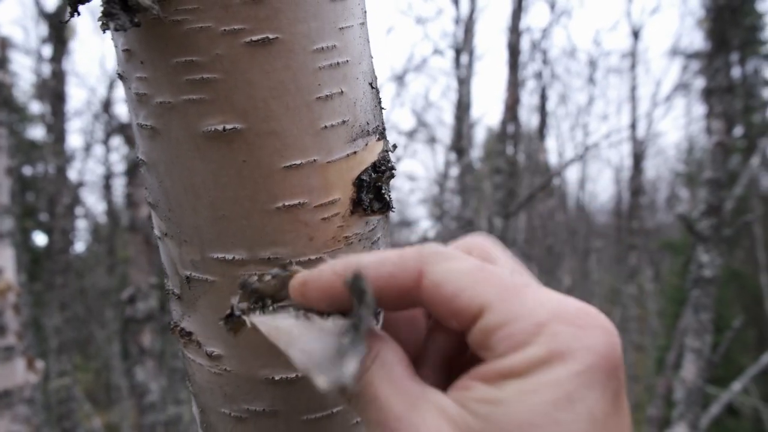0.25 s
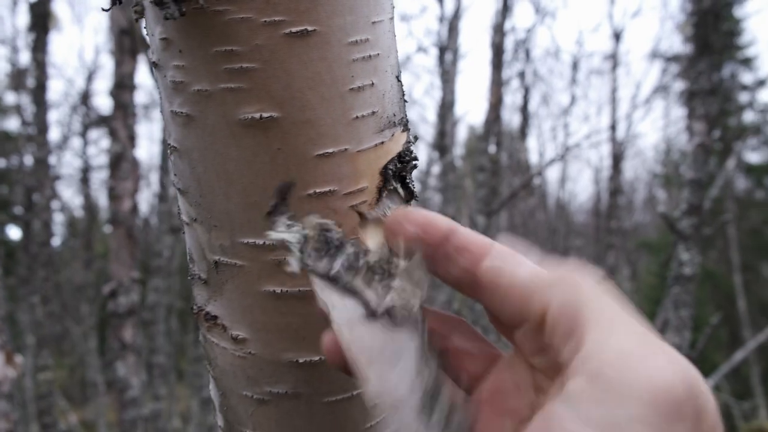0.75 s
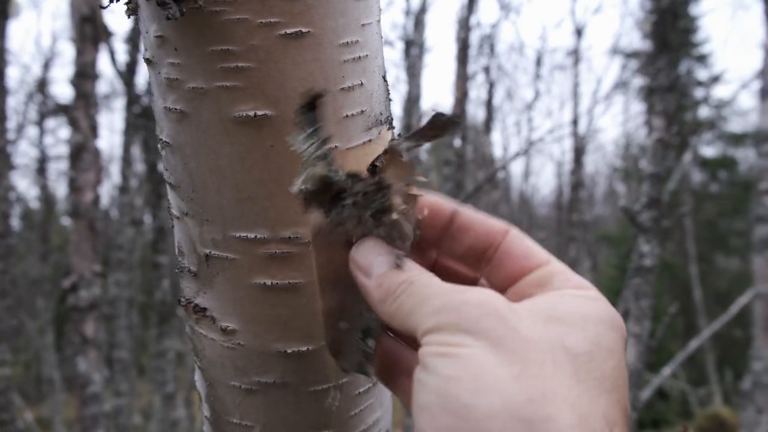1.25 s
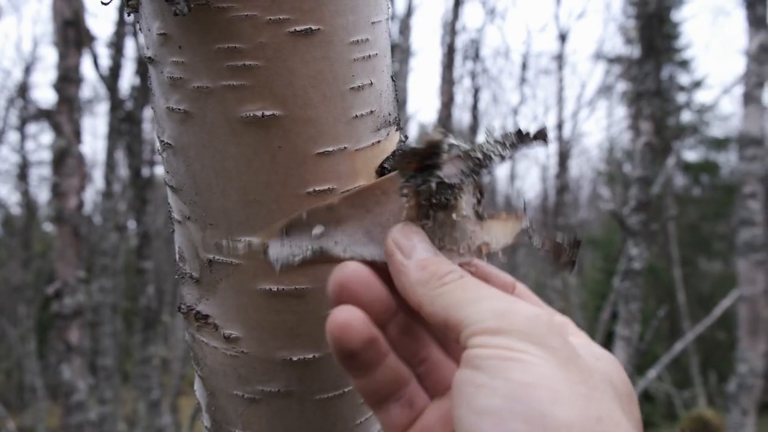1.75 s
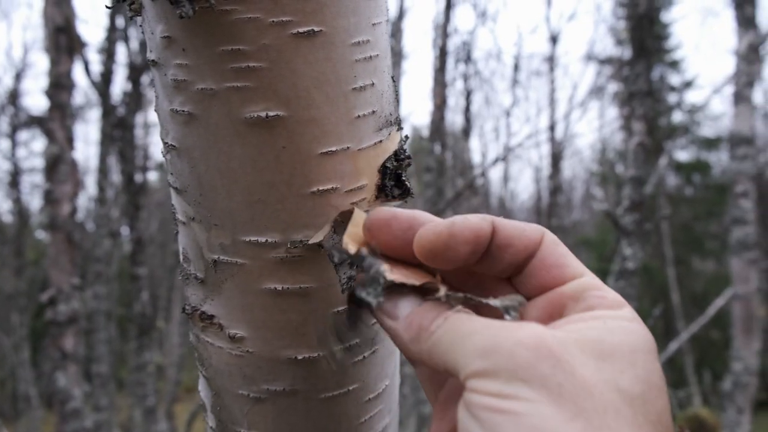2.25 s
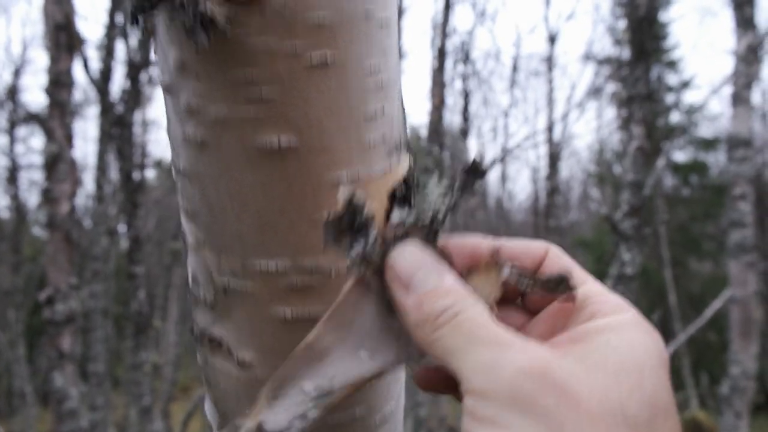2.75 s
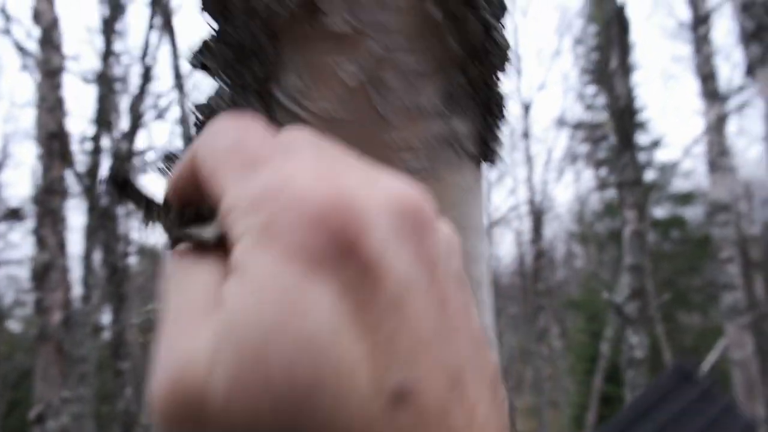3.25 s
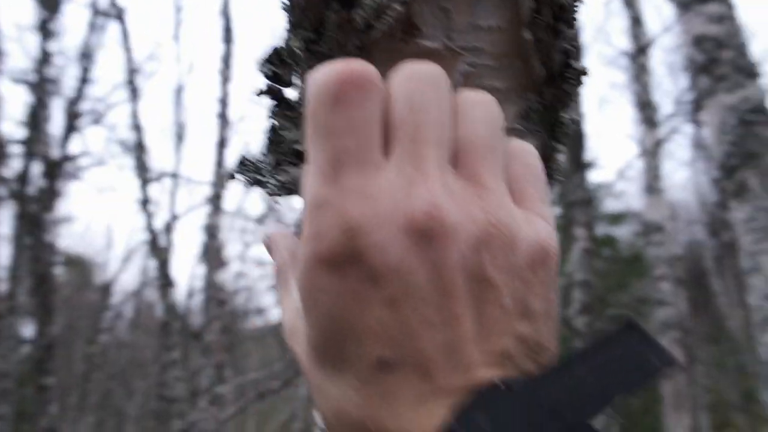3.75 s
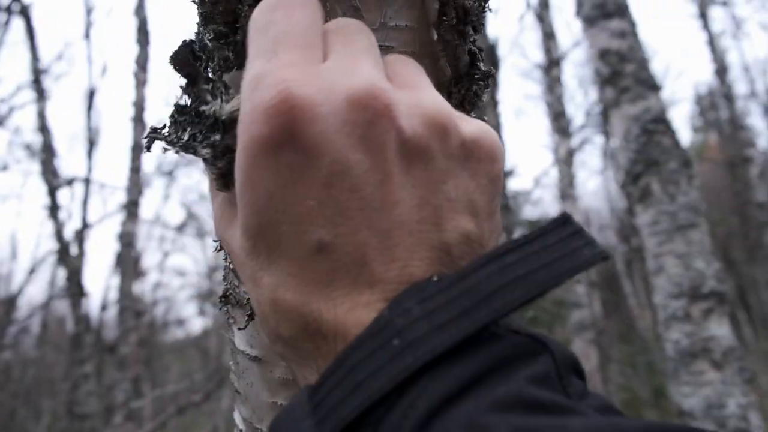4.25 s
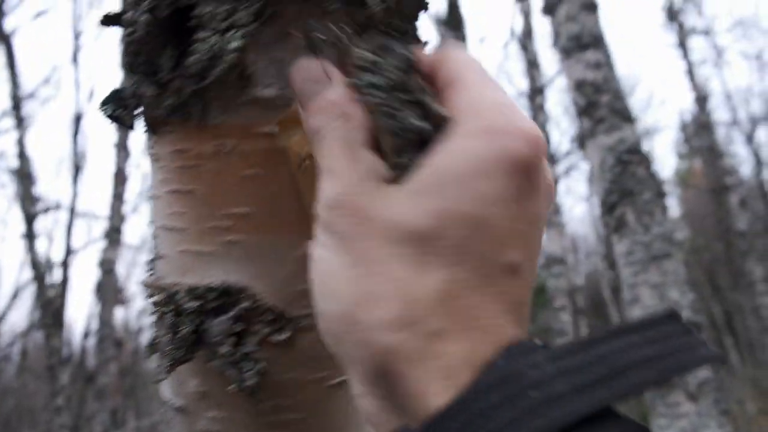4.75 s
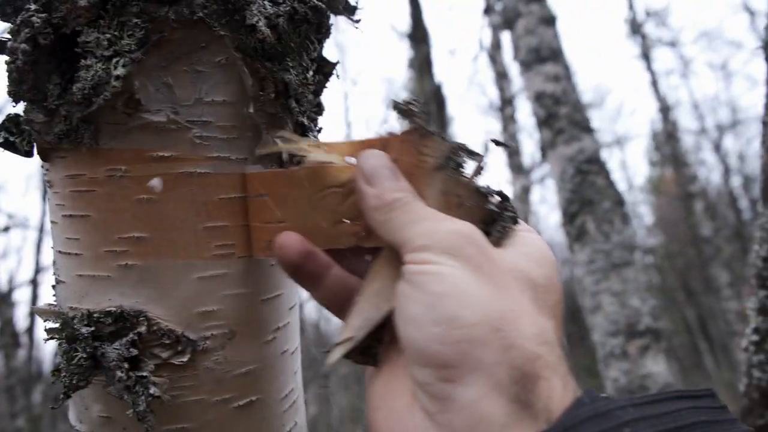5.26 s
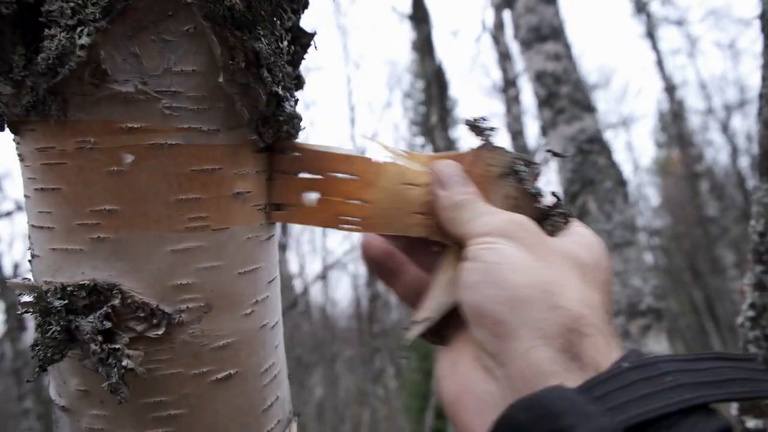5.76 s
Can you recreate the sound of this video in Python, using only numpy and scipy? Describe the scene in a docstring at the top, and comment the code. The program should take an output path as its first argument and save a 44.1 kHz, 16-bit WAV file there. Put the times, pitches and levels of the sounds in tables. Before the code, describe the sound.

Irregular strokes of fingers and sleeve over thin birch bark, dry and crisp, with small flakes ticking and loud snaps breaking out. Light wind buffets the microphone in the first half. Later the bark gives way in a quick jerky rip, then a band peels in small tugs with a low, sinking drum and a hard final crack. Close, dry outdoor stereo with a faint dull forest hush.

```python
"""A sleeve swishes and papery birch bark crinkles close to a small stereo microphone in a quiet, dull wood.
Rubbing is thousands of tiny slips through resonances of bark and sleeve; brittle snaps are short bursts
that ring the bark and a flake. Gusts are lumpy low noise on the microphone, the background hush is dull
noise whose level dips briefly, and knocks ring the trunk. Fibres rip in jerks, and at the end a long band
is pulled off the trunk: small tugs drum it softly under tension, its pitch sinking, and it cracks as it tears."""
import sys
import numpy as np
from scipy import signal
from scipy.fft import rfft, irfft, next_fast_len
from scipy.io import wavfile
from scipy.ndimage import uniform_filter1d

SR = 44100
rng = np.random.default_rng(int(sys.argv[2]) if len(sys.argv) > 2 else 0)


def inscribe(sig):
    """Save sig as 16-bit PCM at rate SR to the path in sys.argv[1].

    A 1-D sig is mono; a 2-D sig holds one channel per row.
    Samples are clipped to [-1, 1] before scaling.
    """
    pcm = np.round(np.clip(np.atleast_2d(sig).T, -1, 1) * 32767)
    wavfile.write(sys.argv[1], SR, pcm.astype(np.int16))


N = 265041  # samples, about 6 s


def from_db(db):
    """Decibels to gain."""
    return 10 ** (np.asarray(db) / 20)


def rms_one(x):
    """Scale to unit power."""
    return x / np.sqrt(np.mean(x ** 2) + 1e-20)


def in_time(rows):
    """Interpolate each column of a curve, whose first column is seconds, at every sample."""
    s, *columns = np.transpose(rows)
    return [np.interp(np.arange(N) / SR, s, column) for column in columns]


def drift(rate):
    """Random wandering of rms 1, with straight lines between `rate` chance values a second."""
    knots = rng.standard_normal(4096)
    return rms_one(np.interp(np.arange(N) / SR * rate, np.arange(len(knots)), knots))


def equalise(x, spectrum):
    """Apply a gain curve of (Hz, dB) points, fading out below 20 Hz."""
    hz, db = np.transpose(spectrum)
    size = next_fast_len(N)
    f = np.maximum(np.arange(size // 2 + 1) * SR / size, 1)
    gain = from_db(np.interp(np.log(f), np.log(hz), db)) * np.minimum(f / 20, 1) ** 2
    return irfft(rfft(x, size) * gain, size)[:N]


def coloured(spectrum):
    """Steady noise with the given spectrum, rms 1."""
    return rms_one(equalise(rng.standard_normal(N), spectrum))


def resonate(x, modes, stretch=1):
    """Parallel resonances of alternating sign; stretch moves them all up or down together."""
    out = 0
    for k, (hz, width, db) in enumerate(modes):
        r = np.exp(-np.pi * width / SR)
        w = 2 * np.pi * hz * stretch / SR
        zeros = np.array([1, 0, -1]) * (1 - r * r) / 2
        poles = [1, -2 * r * np.cos(w), r * r]
        out = out + (-1) ** k * from_db(db) * signal.lfilter(zeros, poles, x + 1e-18)
    # a family radiates little outside its own range
    edges = [modes[0][0] * 0.65, min(modes[-1][0] * 1.26, SR * 9 / 20)]
    return signal.sosfilt(signal.butter(2, edges, "band", fs=SR, output="sos"), out)


def stereo(mid, side, pan_db):
    """Left and right from mid, side and a level difference."""
    return np.array([(mid + side) * from_db(pan_db / 2), (mid - side) * from_db(-pan_db / 2)])


def swells(start, length, level_db, attack_s, release_s, sag_db=0, size=32):
    """Gain of overlapping gestures: each rises, holds while it sags, and dies away; their powers add."""
    t = np.arange(0, N, size)[:, None] / SR
    early = np.maximum(start - t, 0)
    late = np.maximum(t - start - length, 0)
    along = np.clip((t - start) / np.maximum(length, .002), 0, 1)
    # attack and release are the times for 20 dB
    db = level_db - 20 * (early / attack_s + late / release_s) - sag_db * (along - .5)
    return np.interp(np.arange(N) / SR, t[:, 0], np.linalg.norm(from_db(db), axis=1))


# Colour of the far trees' hush. Each row: frequency in Hz, relative density in dB per Hz.
WOOD_AIR = [(25, 7), (70, -4.5), (150, -0.5), (290, 1), (470, 0.5), (750, -5.5), (1600, -8.5),
            (3000, -23.5), (6000, -49), (12000, -47)]
# Level of the background hush, which dips briefly now and then. Each row: time in seconds, level in dB.
AIR_DB = [(0, -59.5), (1.4, -61.5), (3.3, -61), (3.8, -64), (4.3, -63), (4.42, -71), (4.55, -71),
          (5, -59.5), (5.55, -66), (5.64, -73), (5.75, -72), (6, -62)]


def wood_air(side_db=-26):
    """The dull hush of the far trees: coloured noise at a varying level, nearly alike in both ears."""
    level_db, = in_time(AIR_DB)
    return from_db(level_db) * stereo(coloured(WOOD_AIR), from_db(side_db) * coloured(WOOD_AIR), 0)


# Colour of wind on the microphone. Each row: frequency in Hz, relative density in dB per Hz.
BUFFET = [(12, -25), (20, 2), (65, -0.5), (80, -3), (129, -7.5), (252, -24.5), (292, -27.5), (400, -30),
          (520, -27), (880, -120)]
# Gusts at the microphone. Each row: start in seconds, length in seconds, level in dB.
GUSTS = [(0, 0.023, -53), (0.244, 0.22, -60), (.5, 0.43, -50), (0.602, 0.021, -36.5), (0.721, 0.021, -36.5),
         (0.786, 0.027, -44), (2.408, 0.021, -50.5), (2.495, 0.054, -50), (2.662, 0.073, -48.5),
         (2.8, 0.14, -57)]
GUST_ATTACK_S, GUST_RELEASE_S, CALM_DB = 0.045, 0.064, -79.5


def wind(lumps_db=4.5, lumps_per_s=34):
    """Lumpy low buffeting in gusts, alike in both ears."""
    gusts = swells(*np.transpose(GUSTS), GUST_ATTACK_S, GUST_RELEASE_S) + from_db(CALM_DB)
    return gusts * from_db(lumps_db * drift(lumps_per_s)) * coloured(BUFFET)


# The hand knocks the trunk as a piece gives way. Each row: time in seconds, level in dB.
THUDS = [(0.963, -40.5), (2.731, -36), (2.737, -29)]
# Resonances of the damp trunk. Each row: frequency in Hz, width in Hz, relative level in dB.
TRUNK = [(270, 59, 2), (555, 87, 2)]


def thuds():
    """The damp trunk answers a knock with a short, dull note."""
    knocks = np.zeros(N)
    for s, db in THUDS:
        knocks[round(s * SR)] = from_db(db)
    sound = resonate(knocks, TRUNK)
    # the peak of the whole equals the strongest knock
    return sound * knocks.max() / np.abs(sound).max()


# Tugs that peel the long band off the trunk. Each row: start in seconds, length in seconds,
# crackle at the peel line in dB, drumming of the band in dB.
TUGS = [(5.167, 0.02, -43, -44), (5.22, 0.064, -51.0, -54), (5.333, 0.097, -53.5, -57.5),
        (5.453, 0.009, -45.5, -44.5), (5.507, 0.015, -51.5, -60), (5.694, 0.013, -52, -50),
        (5.755, 0.033, -50.5, -55.5), (5.793, 0.041, -58, -64)]
TUG_ATTACK_S, TUG_RELEASE_S = 0.043, .032
# The band sinks in pitch as it grows. Each row: time in seconds, pitch in Hz.
BAND_PITCH = [(5.17, 303), (5.28, 248), (5.7, 243), (5.8, 195)]


def taut_band(width_hz=75, tugs_per_s=350, size=128):
    """Small tugs at the peel line drum the band, whose pitch sinks as it grows longer."""
    s, length, _, drum_db = np.transpose(TUGS)
    pull = swells(s, length, drum_db, TUG_ATTACK_S, TUG_RELEASE_S)
    hz, = in_time(BAND_PITCH)
    tugs = (rng.random(N) < tugs_per_s / SR) * rng.standard_normal(N) + 1e-18
    out, state = np.zeros(N), np.zeros(2)
    r = np.exp(-np.pi * width_hz / SR)
    # retune block by block, carrying the vibration over
    for i in range(0, N, size):
        poles = [1, -2 * r * np.cos(2 * np.pi * hz[i] / SR), r * r]
        out[i:i + size], state = signal.lfilter([1, 0, -1], poles, tugs[i:i + size], zi=state)
    # even out the drumming over 50 ms so that the pull sets its level
    return pull * out / np.sqrt(uniform_filter1d(out ** 2, size=2200) + 1e-12)


# Ring of the stiff outer layer. Each row: frequency in Hz, width in Hz, relative level in dB.
RIP_RING = [(1720, 530, -11), (2640, 400, -5), (3070, 340, -5.5), (3860, 260, 1), (4460, 290, 0)]
# The thick outer layer rips loose in jerks. Each row: start in seconds, length in seconds, level in dB.
RIPS = [(4.573, 0.045, -38.5), (4.617, .002, -39), (4.66, 0.006, -26)]
RIP_ATTACK_S, RIP_RELEASE_S = .01, 0.0045


def rip(per_s=1400, spread_db=5.5, side_db=-9, pan_db=4):
    """Fibres part in a fast uneven run and set the stiff outer layer ringing."""
    jerks = swells(*np.transpose(RIPS), RIP_ATTACK_S, RIP_RELEASE_S)
    sizes = from_db(spread_db * np.minimum(rng.exponential(1, N), 3))
    breaks = (rng.random(N) < per_s / SR) * sizes
    push = np.array([breaks * rng.choice([-1, 1], N), breaks * rng.standard_normal(N)])
    mid, side = resonate(push, RIP_RING)
    return jerks * stereo(rms_one(mid), from_db(side_db) * rms_one(side), pan_db)


# Strokes of fingers and sleeve over the bark. Each row: start in seconds, length in seconds,
# level of the sheet's ring in dB, its bending in dB relative to that, its fine edges likewise.
STROKES = [(0, 0.011, -47, 1, 2), (0.048, 0.058, -50.5, -1, 2.5), (0.221, 0.034, -61.5, -8, 0.5),
           (0.403, 0.011, -45.5, -2.5, -4), (0.524, 0.019, -47.5, -1.5, -4), (0.585, 0.012, -51, 0.5, -8),
           (0.64, 0.073, -58, 3, -4), (0.765, 0.021, -62.5, 8.5, 0.5), (0.932, 0.038, -46.5, -1, -9.5),
           (1.041, 0.024, -56.5, 4, 1.5), (1.117, 0.059, -62.5, 8, 6.5), (1.201, 0.029, -43.5, -4, -2.5),
           (1.26, 0.032, -53.5, -0.5, -6), (1.408, 0.014, -44.5, -3.5, -7), (1.435, 0.103, -50.0, -1, -7.5),
           (1.715, 0.0089, -53.5, -3.0, -4.5), (1.801, 0.119, -52.5, -2.5, -4.5),
           (1.954, 0.06, -53, 1, 0.5), (2.096, 0.057, -48.5, -4.5, -1.5), (2.274, 0.059, -57.5, 2, 1.5),
           (2.374, 0.037, -50.5, -3.0, -3.5), (2.435, 0.084, -58.0, 1.5, 0.5), (2.621, 0.036, -53, -1, 1),
           (2.656, 0.081, -48.0, 4.0, -5), (2.827, 0.103, -52.5, -1, -5.5), (3.015, 0.092, -50, -1.0, 0),
           (3.152, 0.206, -55, 4, -1), (3.491, 0.05, -52, 0, -3.5), (3.669, 0.023, -60.5, 6.5, 0.5),
           (3.914, 0.11, -59.0, 0.5, -1.5), (4.092, 0.018, -56, 3.5, -12), (4.177, 0.094, -55, 2.5, -1.5),
           (4.294, 0.107, -51.0, -4.5, -6.5), (4.512, 0.195, -47.5, -8, -2.5),
           (4.658, 0.0072, -34.5, -6, -8), (4.723, 0.099, -54.0, -6, -6), (4.85, 0.059, -47.5, -5.5, -3.5),
           (4.947, 0.15, -51.5, -7, -5), (5.115, 0.018, -45, 1, -5.0)]
STROKE_ATTACK_S, STROKE_RELEASE_S = .044, .032
STROKE_SAG_DB = -1  # negative: each stroke presses harder along its way
# Light rustle of the bark in the hand, following the firmness of the grip.
# Each row: time in seconds, level of the sheet in dB.
GRIP = [(0.0, -57.5), (0.3, -79.5), (0.48, -63), (0.76, -77.0), (1.15, -58.5), (1.56, -61.0), (1.64, -77.5),
        (2.05, -63.0), (2.2, -72.5), (2.8, -61.5), (3.4, -59.5), (3.75, -70), (4.13, -64), (4.47, -60.5),
        (5.05, -57), (5.55, -63.5), (5.64, -70), (6.0, -75.0)]
# bending and fine edges relative to the sheet
PEEL_BEND_DB, PEEL_EDGE_DB = -4, -1.5
GRIP_BEND_DB, GRIP_EDGE_DB = 2.5, -1.5


def friction():
    """Level in dB of the bending, sheet and fine edges: strokes and tugs over the rustle of the grip."""
    s, length, level_db, bend_db, edge_db = np.transpose(STROKES)
    tug_s, tug_length, peel_db, _ = np.transpose(TUGS)
    tugs = swells(tug_s, tug_length, peel_db, TUG_ATTACK_S, TUG_RELEASE_S)
    grip_db, = in_time(GRIP)
    tints = [(bend_db, PEEL_BEND_DB, GRIP_BEND_DB), (0, 0, 0), (edge_db, PEEL_EDGE_DB, GRIP_EDGE_DB)]
    levels = []
    for stroke_tint, peel_tint, grip_tint in tints:
        strokes = swells(s, length, level_db + stroke_tint, STROKE_ATTACK_S, STROKE_RELEASE_S, STROKE_SAG_DB)
        peel = tugs * from_db(peel_tint)
        grip = from_db(grip_db + grip_tint)
        levels.append(10 * np.log10(strokes ** 2 + peel ** 2 + grip ** 2))
    return levels


def trunk_echo(x, echo=0.37, delay_ms=1.117, sway=0.226):
    """The trunk mirrors the sound; the comb of this short echo shifts as the hand moves."""
    n = np.arange(N)
    lag = delay_ms / 1000 * SR * np.exp(sway * drift(3.5))
    return np.array([ear + echo * np.interp(n - lag, n, ear) for ear in x]) / np.sqrt(1 + echo ** 2)


# What the hand is doing in front of the microphone. Each row: time in seconds, share of sleeve swish
# from 0 to 1, spread of the grain sizes in dB, left-right difference in dB.
HAND = [(0, 0.9, 3, 0), (.3, 0.35, 4.5, 3.5), (.55, 0.8, 4.5, 1.5), (.95, 0.67, 6.5, 1.5),
        (1.25, 0.74, 2, 0.5), (1.42, 0.08, 1, -0.5), (1.9, 0, 3.5, 0.5), (2.3, 0.5, 5.5, 0.5),
        (2.8, 0.23, 0.5, 1.5), (3.05, 0.9, 2.5, 1), (3.3, 0.66, 3, 4.5), (3.55, 0.05, 5, 0.5),
        (4.2, 0.33, 3.5, 3), (4.6, 0.22, 4, 1), (4.9, 0.28, 3.5, 1), (5.2, 0.69, 6, 1.5), (6, 0.08, 7, 3)]
# Resonances of the bark in three families: bending, sheet, fine edges.
# Each row: frequency in Hz, width in Hz, relative level in dB.
BARK = [
    [(454, 690, -5), (848, 270, 2), (1227, 610, 2), (1890, 440, 4.5), (2706, 830, 1.5)],
    [(3120, 1170, -1.5), (4070, 303, 6.5), (4730, 780, 3), (5900, 1260, 0)],
    [(6930, 1300, 0.5), (9070, 960, 5), (10750, 2040, 1.5)],
]
# Resonances of the sleeve's swish in the same three ranges, with the same columns.
SLEEVE = [
    [(398, 96, 2.5), (1076, 316, 6), (1770, 1020, 12), (2180, 1330, 12.5)],
    [(3380, 1000, -1), (4660, 3600, -4.5), (5550, 1280, 9)],
    [(8130, 2160, 0), (9570, 560, 6), (11050, 1260, -1.5)],
]
# Unlikeness of the two ears: side against mid in dB for each family, before the hand's place is added.
SIDE_DB = [-23, -10, -7]


def rubbing(levels_db, per_s=8000, flutter_db=1.75, own_flutter_db=2.0, family_db=(0, 0, 0),
            fibres_per_s=110, fibre_size=2.73, fibre_spread_db=3.0, centred_db=-5.0, off_axis=3.24):
    """Thousands of tiny slips a second excite bark and sleeve; crinkling makes them uneven and breaks fibres."""
    sleeve, spread_db, pan_db = in_time(HAND)
    sleeve = np.clip(sleeve, 0, 1)
    slip_sizes = from_db(spread_db * np.minimum(rng.exponential(1, N), 4))
    slips = (rng.random(N) < per_s / SR) * slip_sizes
    slips = slips * from_db(flutter_db * drift(260))
    # even out their power over 29 ms
    slips /= np.sqrt(uniform_filter1d(slips ** 2, size=1300) + 1e-9)
    # the more uneven the crinkling, the thicker the fibres that break; fewer under the sleeve
    fibre_sizes = from_db(fibre_spread_db * np.minimum(rng.exponential(1, N), 2))
    fibres = (rng.random(N) < fibres_per_s * (1 - sleeve / 2) / SR) * fibre_sizes
    slips += fibres * fibre_size * from_db(2 * spread_db)
    out = 0
    for k, level_db in enumerate(levels_db):
        # each slip radiates in a direction of its own
        push = slips * rng.choice([-1, 1], N)
        push = np.array([push, push * rng.standard_normal(N)])
        bark_part = np.sqrt(1 - sleeve) * rms_one(resonate(push, BARK[k]))
        sleeve_part = np.sqrt(sleeve) * rms_one(resonate(push, SLEEVE[k]))
        mid, side = bark_part + sleeve_part
        gain = from_db(level_db + family_db[k] + own_flutter_db * drift(60))
        # the further to the left the hand, the less alike the two ears
        unlike = from_db(SIDE_DB[k] + centred_db + off_axis * pan_db)
        # the low bending family is not shaded to one side
        out = out + gain * stereo(mid, side * unlike, pan_db * (k > 0))
    return trunk_echo(out)


# small flakes: their number, level above the rubbing, and tint and pitch around which each one scatters
TICK_COUNT, TICK_OVER_RUB_DB, TICK_SPREAD_DB = 18, 7.5, 3.5
TICK_BEND_DB, TICK_EDGE_DB, TICK_HZ = -8, -2, 3760


def ticks(rub_db, fracture_ms=0.86):
    """Rows like those of the snaps for small flakes that break at random, likelier in firm, uneven rubbing."""
    _, spread_db, pan_db = in_time(HAND)
    chance = np.cumsum(from_db(rub_db / 2 + spread_db))
    at = np.searchsorted(chance, rng.random(TICK_COUNT) * chance[-1])
    size, bend, edge, pitch = rng.standard_normal((TICK_COUNT, 4)).T
    level_db = rub_db[at] + TICK_OVER_RUB_DB + TICK_SPREAD_DB * size
    flake_hz = TICK_HZ * 2 ** np.tanh(pitch)
    return list(zip(at / SR, level_db, np.full(TICK_COUNT, fracture_ms),
                    TICK_BEND_DB + 5 * bend, TICK_EDGE_DB + 5 * edge, pan_db[at], flake_hz))


# The loud brittle snaps, close by. Each row: time in seconds, level in dB, length of the fracture in ms,
# bending in dB relative to the sheet, fine edges likewise, left-right difference in dB,
# ring of the flake in Hz.
SNAPS = [(.4075, -38, 0.079, -10, -1, 7, 5260), (.5943, -42.5, .45, -3, -1, 0, 5540),
         (.7193, -39.5, 0.18, 4.5, -5, 0.5, 2420), (.7837, -42, 1, -4, -1, 3, 4910),
         (.8945, -40, 0.95, 4, -7, 0.5, 4770), (.9243, -37.5, .2, -24, -12, 6, 5400),
         (.9278, -35, .5, -23, -4, 5, 5100), (.9384, -32.5, 0.34, -2, 0, 1, 3220),
         (.9417, -37, 0.35, -23, 1, -4, 3270), (.9609, -35, 0.47, -11, -3, 2, 5280),
         (.967, -31, 0.36, 2.5, 1, -6, 5700), (.9799, -41.5, 0.47, -4, -3, 6, 5690),
         (1.1994, -39.5, 0.21, 5, 5, -0.5, 6400), (1.2046, -29.5, .3, -10, 28, 6, 5260),
         (1.405, -37, .3, -15, -20, -0.5, 1430), (1.965, -27.5, 0.28, -12.5, -5, 2.5, 5100),
         (1.986, -38, .19, -5, -6, 3, 5030), (2.016, -35.5, 0.79, 18, 6, 2, 910),
         (2.3158, -42, .76, -2, -14, 2, 3100), (2.3946, -33.5, 0.19, 6, -10, 1.5, 1700),
         (2.612, -40, 1, -6, 5, 2, 1870), (2.6903, -27, 0.26, 8.5, -2, -.5, 2160),
         (2.7304, -34.5, 1, -2, -3, 1, 6100), (2.737, -21.5, 0.19, 9, -1.5, 0, 4920),
         (2.8951, -41.5, 0.29, 13, -7, 2, 2050), (2.962, -41, .3, 5, 16, 1, 5900),
         (3.164, -41, .6, -13, 3, 3, 6100), (3.2219, -36, 0.11, -27, 4, 7, 6060),
         (3.4142, -46, 0.32, -7, 25, 1, 780), (3.4265, -47.5, .25, -10, 20, 2, 5000),
         (3.7756, -51, 0.39, 5, 16, 7, 1600), (3.9969, -24.5, 0.11, -7, -6.5, 8.5, 4790),
         (3.9982, -20.5, 0.58, -10, -11, 0, 1670), (4.3385, -30.5, 0.45, -2.5, 0, 1, 3580),
         (4.3549, -38, .3, -1, 8, -1, 5950), (4.3578, -30, 0.15, -1, 10, 3, 2660),
         (4.363, -40, .26, 9, 10, 0, 3700), (4.3714, -40, .38, -20, 17, 13, 5340),
         (4.3834, -37, 0.3, -18, 0, -5, 3000), (4.4016, -28.5, 0.26, -11.5, -4.5, 1, 5380),
         (4.4486, -40.5, 0.44, -2.5, 0, 0, 3660), (4.5751, -37.5, 0.33, -25, -4, 3, 4480),
         (4.6006, -33, .55, -30, -18, -4, 3870), (4.6531, -34, .46, -6, -4, -3, 3830),
         (4.6613, -22.5, .37, -21, 0, 3, 4110), (4.6988, -37.5, .64, -2, -3, 1, 5900),
         (4.7353, -31.5, 1, -4, -5, 2, 3300), (4.8089, -41, .21, -19, -6, 3, 4600),
         (5.0278, -39.5, 0.53, 1, -2.5, 1, 2200), (5.0748, -38.5, 0.27, -10, -1, 2.5, 804),
         (5.1743, -29.5, 0.35, -1, 4, 0, 2490), (5.1961, -38, .3, 11, -10, -1, 1920),
         (5.2391, -45, 0.43, 9, 3, 0, 4940), (5.2682, -44, .3, -10, 3, 7, 4260),
         (5.2901, -33.5, 1, 3, 7, 3, 4770), (5.3368, -39.5, 0.54, -4, 2, -2, 5400),
         (5.4624, -24.5, .37, -4, 7, -2, 6740), (5.467, -37, 0.17, -9, 0, 7, 4870),
         (5.5664, -47.5, 0.28, 2, -1, -1, 2170), (5.595, -48, 0.32, -14, -4, 3, 5300),
         (5.6146, -17, 0.92, -5.5, -5, -0.5, 4540), (5.6759, -28, 0.1, 0.5, 0, -1, 5960),
         (5.697, -39, 0.99, 2, -3, -1, 4980), (5.748, -40.5, .54, -5, -19, 3, 4640),
         (5.7726, -39, 0.29, -3, -7, -1, 4670), (5.833, -44.5, .4, -2, 4, 1, 4800),
         (5.967, -50, 0.4, -5, -9, -1, 4800)]


def snaps(rows, splinter=0.33, tail_db=-17.5, tail_s=0.0023, detune=0.16, family_db=(-1, -1, -1),
          flake_db=-7, flake_width_hz=320, size=900):
    """One sharp break and a quick run of splinters; the bark answers and the flake rings at its own pitch."""
    out = np.zeros((2, N + size))
    t = np.arange(size) / SR
    for s, level_db, length_ms, bend_db, edge_db, pan_db, flake_hz in rows:
        grit = rng.standard_normal((2, size))
        fracture = splinter * np.exp(-t * 1e3 / max(length_ms, .05))
        push = grit * (fracture + from_db(tail_db) * np.exp(-t / tail_s))
        push[0, 0] += 2  # the sharp break, alike in both ears
        # the bark's resonances shift at random from snap to snap
        stretch = np.exp(detune * rng.uniform(-1.3, 1))
        at = round(s * SR)
        shares = from_db([bend_db, 0, edge_db])
        shares = shares / np.linalg.norm(shares) * from_db(family_db)
        flake = rms_one(resonate(push[0], [(flake_hz, flake_width_hz, 0)]))
        snap = from_db(flake_db) * stereo(flake, 0, pan_db)
        for modes, share, side_db in zip(BARK, shares, SIDE_DB):
            mid, side = resonate(push, modes, stretch)
            snap = snap + share * stereo(rms_one(mid), rms_one(side) * from_db(side_db), pan_db)
        # the level is reckoned as if the energy filled about 4 ms
        out[:, at:at + size] += from_db(level_db) * np.sqrt(0.0041 * SR / size) * snap
    return out[:, :N]


def scene():
    """Close, dry bark over the open air."""
    levels_db = friction()
    bark = rubbing(levels_db) + rip() + snaps(SNAPS) + thuds() + taut_band()
    return bark + wind() + wood_air() + snaps(ticks(levels_db[1]))


# Closely spaced capsules hear the bass alike. Each row: frequency in Hz, gain of their difference in dB.
EAR_DIFFERENCE = [(100, -8), (350, -13.5), (680, 1), (1080, -6.5), (1550, 7), (2400, 4), (4000, 1),
                  (5800, -1), (8300, 4.5), (10500, 0.5)]


def capsules(dry):
    """Two close capsules: broadly, the shorter the wave the more they differ, with ripples from the housing."""
    mid, side = (dry[0] + dry[1]) / 2, (dry[0] - dry[1]) / 2
    return stereo(mid, equalise(side, EAR_DIFFERENCE), 0)


CUTOFF_HZ = 11750


def record(dry):
    """A small stereo microphone; the top is cut steeply."""
    low_pass = signal.ellip(10, .2, 70, CUTOFF_HZ, fs=SR, output="sos")
    return signal.sosfilt(low_pass, capsules(dry))


dry = scene()
out = record(dry)
inscribe(out)
```